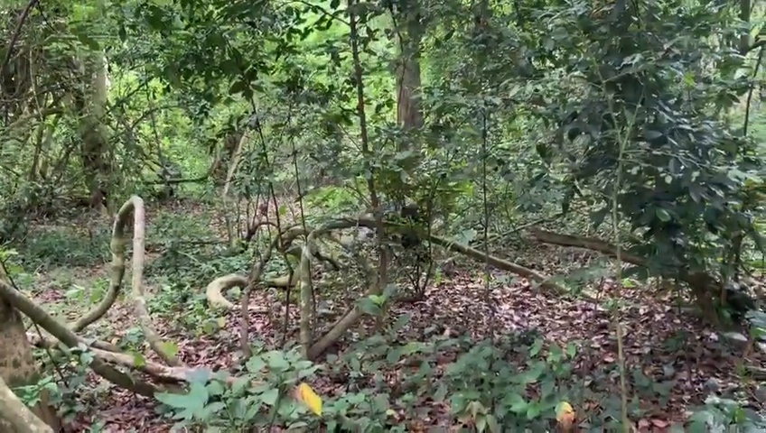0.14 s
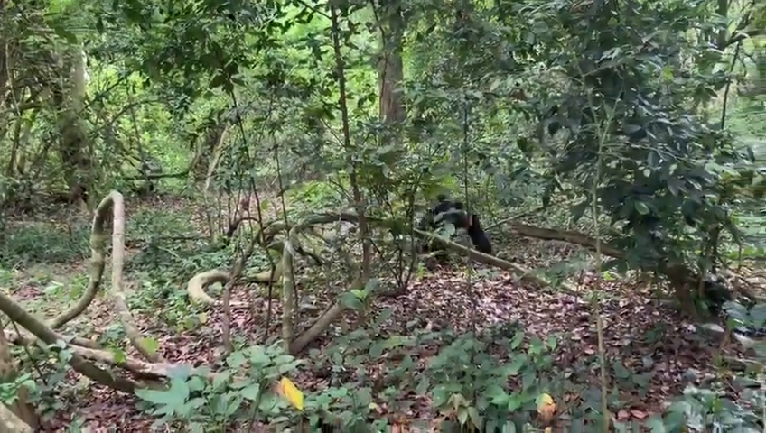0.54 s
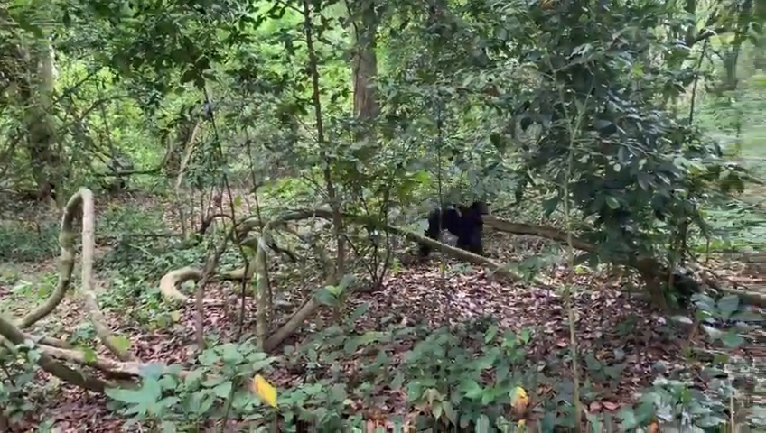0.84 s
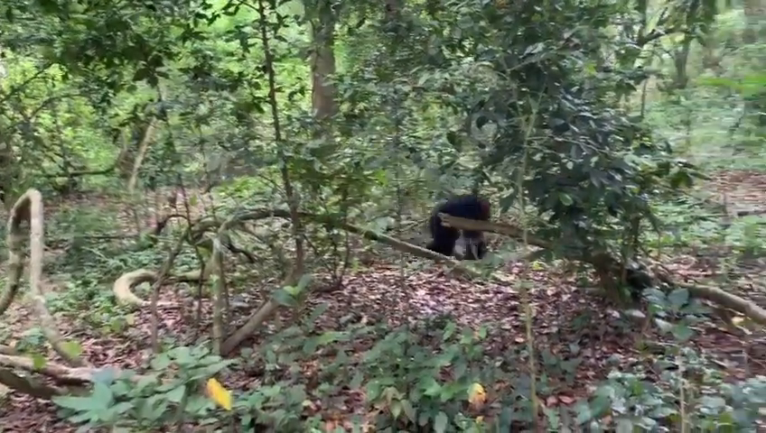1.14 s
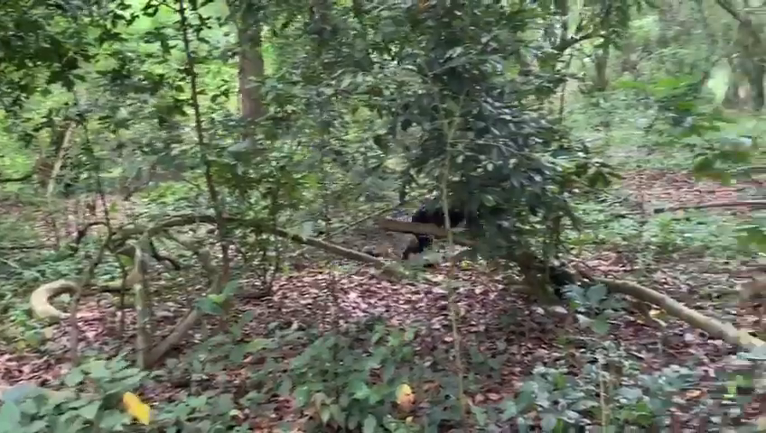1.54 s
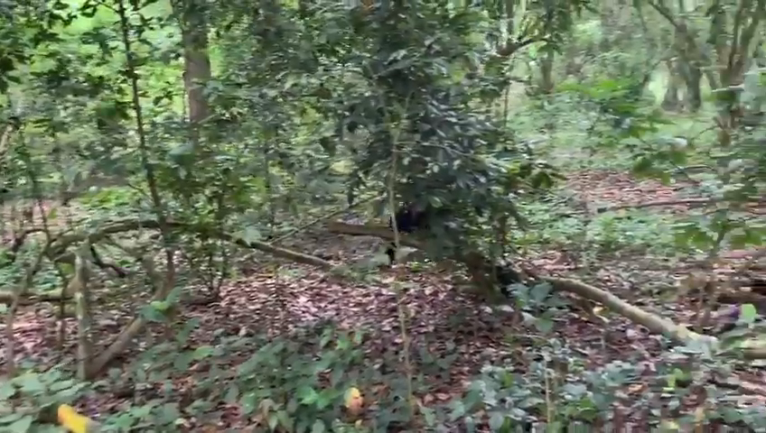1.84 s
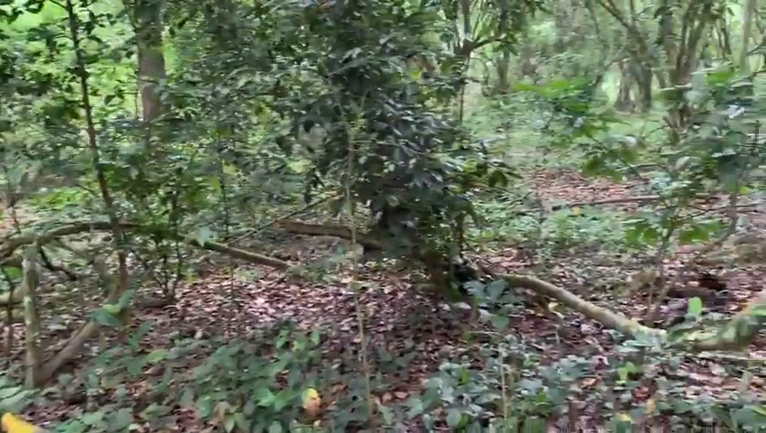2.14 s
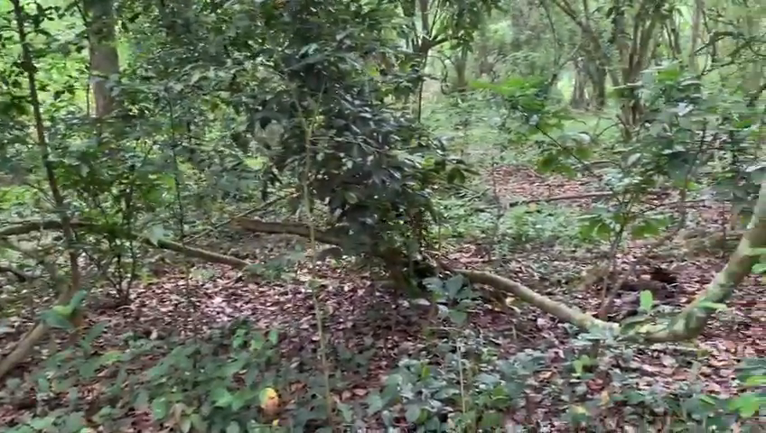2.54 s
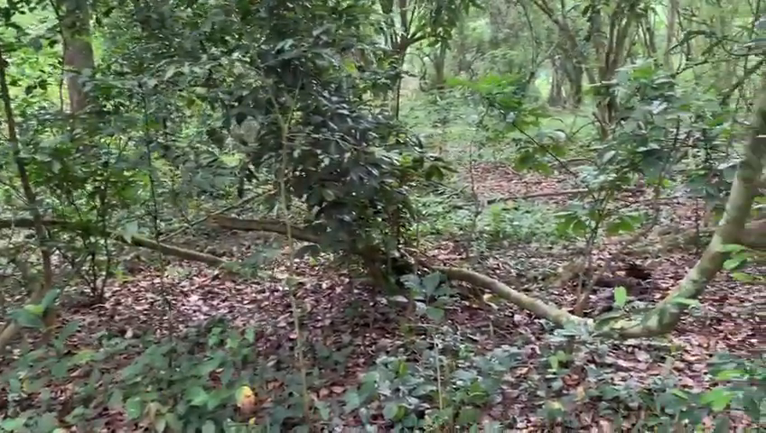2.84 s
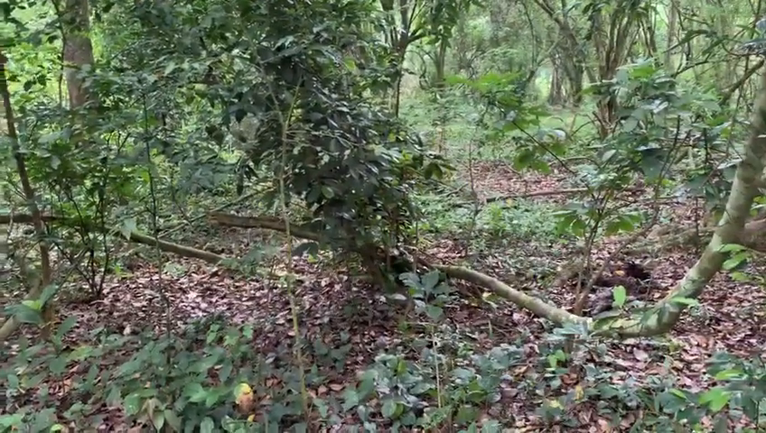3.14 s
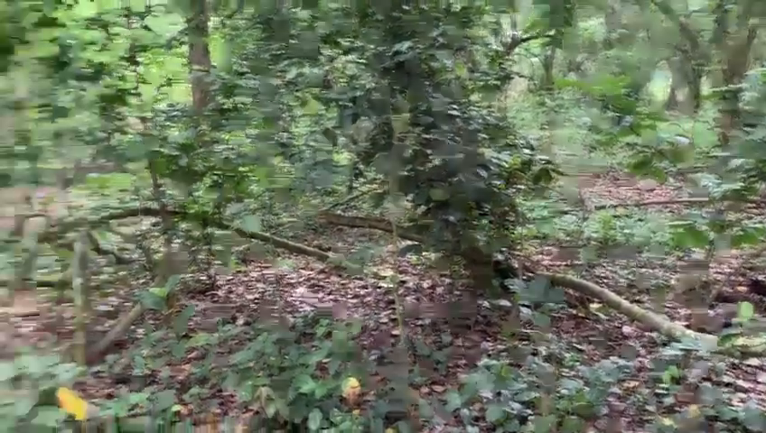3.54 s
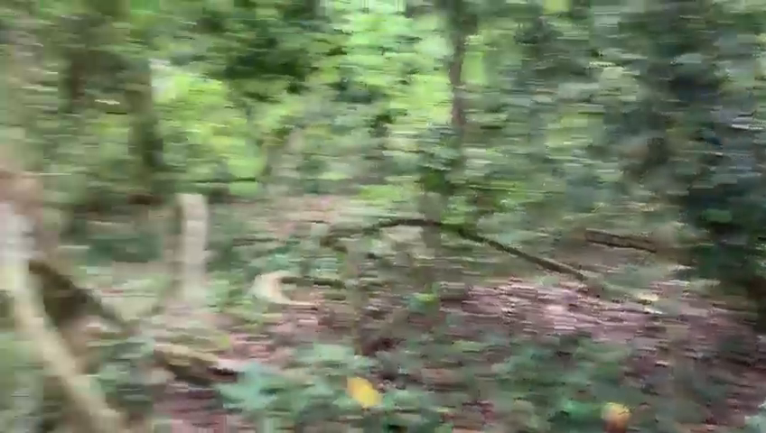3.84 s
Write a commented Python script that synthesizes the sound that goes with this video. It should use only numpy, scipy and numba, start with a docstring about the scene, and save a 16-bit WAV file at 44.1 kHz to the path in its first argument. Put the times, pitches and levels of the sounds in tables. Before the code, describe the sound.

A chimpanzee opens with a shrill, throbbing scream until 0.2 s, snarls to 0.35, hoots and wails in gliding tones to 1.0, growls roughly to 1.35, barks to 1.6, then groans and grunts lower until about 2.4. Dry leaves crackle, strongest at first, with brief microphone rumble. Trunks return thin echoes. High insect hiss and quiet air continue; faint distant bird chirps waver around 3.0-3.3 s.

```python
"""A forest at a stereo microphone: insects hiss steadily, air is quiet, and the moving microphone rumbles at first.
A chimpanzee runs over leaf litter, a crackle of noise grains: first a throbbing, shrill scream, then a snarl,
gliding hoots and a bark between rough growls, sinking to low grunts. Clear calls are summed harmonics, growls
are uneven pulses ringing a throat. The trunks return a thin echo of each call.
Once the calls have died away a distant bird chirps in wavering, gliding tones."""
import sys
import numpy as np
from scipy import signal
from scipy.fft import rfft, irfft
from scipy.io import wavfile
from scipy.ndimage import uniform_filter1d
from numba import njit

SR = 44100
rng = np.random.default_rng(int(sys.argv[2]) if len(sys.argv) > 2 else 0)


def store_wav(level_fs):
    """Save 16-bit WAV to argv[1]."""
    pcm = np.round(np.clip(np.atleast_2d(level_fs), -1, 1) * 32767)
    wavfile.write(sys.argv[1], SR, pcm.T.astype(np.int16))


N = 176400
T = np.arange(N) / SR

# forest bed, spectra of insects and still air: frequency_hz, relative_level_db
INSECT_COLOUR = [(4700, -29), (5500, -2), (6000, -8.5), (7100, 0), (7550, -11.5), (7900, -34)]
AIR_COLOUR = [(40, 1.5), (1400, -28), (2400, -11), (3600, -23), (7000, -40.5)]
# low rumble of the moving microphone: time_s, level_db
RUMBLE_LEVEL = [(.28, -52.5), (.5, -85), (2.6, -82)]
# its spectrum: frequency_hz, relative_level_db
RUMBLE_COLOUR = [(20, -12.5), (90, 0.5), (600, -33.5)]
# running through dry leaves: time_s, level_db (before a fixed lift)
RUSTLE = [(0, -40.5), (.5, -55), (1.4, -55.5), (1.65, -68.5), (2.15, -66.5), (2.3, -82)]
# spectrum of the leaves: frequency_hz, relative_level_db
LEAF_COLOUR = [(500, -6), (2800, 4.5), (6000, -2), (8500, 5.5), (11000, -26)]
# voiced calls: time_s, pitch_hz, fundamental_db, second_harmonic_db, third_harmonic_db (higher ones follow it)
SCREAM = [(0, 1201, -19, -34, -33.5), (.05, 1175, -14.5, -26, -34), (.085, 1090, -14.5, -16, -30),
          (.158, 1069, -18, -18, -25.5), (.18, 942, -13, -19.5, -42.5), (.197, 748, -35, -45, -66.5)]
HOOT = [(.328, 552, -35.5, -48, -81.5), (.348, 567.3, -18, -26, -44), (.497, 519, -28.5, -18, -45.5),
        (.522, 476.7, -34.5, -26.5, -77), (.53, 336, -43, -21.5, -43), (.549, 288, -41.5, -33.5, -59.5)]
WAIL = [(.567, 395.4, -65, -39, -44), (.584, 418, -37, -24, -24), (.603, 440, -40.5, -29, -46.5),
        (.628, 424, -44.5, -19.5, -29.5), (.652, 399.3, -41, -20.5, -29),
        (.715, 424.8, -38.5, -24.5, -35.5), (.805, 453.4, -43.5, -8, -37),
        (.858, 428.2, -43.5, -19.5, -34.5), (.895, 614, -29, -36, -28), (.922, 804.5, -10, -34.5, -30),
        (.945, 796, -8.5, -31.5, -31), (.965, 667, -29.5, -28.5, -31.5), (1.005, 577, -40, -43.5, -50)]
BARK = [(1.365, 357, -44.5, -21.5, -28.5), (1.393, 412.8, -41, -10.5, -25.5), (1.418, 466.6, -37, -17, -28),
        (1.49, 494.7, -34.5, -16.5, -34), (1.508, 423.4, -46, -11, -32.5), (1.522, 367.2, -45, -26.5, -25),
        (1.545, 360.7, -42, -18.5, -27), (1.58, 292.6, -52.5, -30, -42.5)]
# throat colour of their overtones: frequency_hz, relative_level_db
SCREAM_THROAT = [(3300, -1), (4400, 1), (6000, -13.5), (8700, -3.5), (12000, -26.5)]
HOOT_THROAT = [(1750, 6.5), (2350, -8), (2900, -17.5), (4200, -27), (11000, -49)]
BARK_THROAT = [(1350, 6.5), (1750, -27), (2800, -17.5), (6000, -43)]
# hoarseness of the voiced calls: time_s, roughness (0-1)
HOARSE = [(.05, 0.68), (.08, 0.01), (.2, 0.01), (.595, 0.57), (.65, 0.11), (.935, 0), (1.39, 0.15),
          (1.56, 0.32)]
# growls: time_s, pulse_rate_hz, level_db, roughness (0-1), mouth_resonance_hz
SNARL = [(.195, 143.6, -31.5, 0.5, 980), (.25, 140.8, -21, 0.1, 806), (.305, 115.1, -18.5, 0.17, 960),
         (.345, 122.1, -31, 0.15, 941)]
GROWL = [(1.033, 131.1, -30, 0.55, 873), (1.062, 130.8, -18, 0.059, 793), (1.15, 126.5, -21.5, 0.39, 767),
         (1.185, 125.2, -18.5, 0.021, 574), (1.25, 126.8, -17.5, 0.04, 593), (1.275, 121.9, -20, .45, 840),
         (1.298, 110.8, -19.5, 0.47, 730), (1.338, 104.9, -33.5, 0.34, 600)]
GROAN = [(1.622, 96.04, -48, 0.93, 510), (1.645, 95.74, -28, 0.27, 741), (1.7, 90.17, -31, 0.63, 330),
         (1.815, 91.76, -28.5, 0.057, 373), (1.94, 78.84, -31, 0.62, 289), (1.98, 69.5, -39.5, 0.5, 252.9)]
GRUNT = [(1.985, 72.24, -40.5, 0.6, 231.7), (2.06, 63.02, -38, 0.66, 220), (2.225, 61, -44.5, 0.18, 90.1),
         (2.29, 57.9, -60.5, 0.26, 64.8), (2.335, 142.5, -52, 0.12, 140), (2.4, 107, -68.5, 0.091, 108.3)]
# growl colour with open lips, nearly closed lips, and in the last deep grunts: frequency_hz, relative_level_db
OPEN_THROAT = [(60, -28.5), (125, -10), (270, -18), (520, 0.5), (900, 0), (1200, -7.5), (1450, -42),
               (1900, -12.5), (2200, -38), (6000, -50.5)]
CLOSED_THROAT = [(35, -15), (70, -4.5), (180, 3), (350, 2), (540, -11.5), (720, 7.5), (1250, -39.5),
                 (2400, -47), (3300, -23.5), (3900, -73)]
CHEST = [(25, -6), (62, 2.5), (600, -11.5), (1600, -40)]
# spectrum of the trunk echo: frequency_hz, relative_level_db
ECHO_COLOUR = [(800, -12), (2200, -1.5), (12000, -10)]
# distant chirps: start_s, length_s, start_hz, end_hz, level_db
CHIRPS = [(2.963, 0.051, 2157, 1600, -67.5), (3.03, 0.088, 2850, 3120, -65.5),
          (3.138, 0.057, 1807, 2660, -63), (3.273, 0.064, 2500, 1890, -67.5)]

INSECT_DB, AIR_DB = -63, -71.5
FLUTTER_HZ, FLUTTER_PEAK_S, FLUTTER_END_S, FLUTTER_DEPTH = 62.2, 0.003, 0.069, 0.72
# fractions: pitch and level shake at full roughness, and a pitch wobble that is always there
JITTER, SHIMMER, WOBBLE = 0.072, 0.3, 0.007
WAVER_DB, WAVER_HZ = 3.5, 30  # each harmonic from the third up wavers on its own
RUSH_DB = -8.5  # throat air at full roughness, relative to the third harmonic
ECHO_DB, ECHO_T60_S = -16.5, 0.57
FAR_DB, FAR_T60_S = -19.5, 2.4  # long tail, level relative to the near echo
PORT_LAG_S, PORT_MAX_RAD = 0.00006, 2.2  # right microphone port behind left
TOP_HZ = 12200  # upper limit of the recorder and of the harmonics


def undb(db):
    """Decibels to gain."""
    return 10 ** (np.asarray(db) / 20)


def unit(x):
    """Scale to rms 1."""
    return x / np.sqrt(np.mean(x ** 2))


def response(points, hz):
    """Gain of a spectrum at the given frequencies, straight in dB over log frequency."""
    point_hz, db = np.array(points).T
    return undb(np.interp(np.log(np.maximum(hz, 1)), np.log(point_hz), db))


def colour(x, points):
    """Causal (minimum-phase) filter with the given spectrum, by folding its cepstrum."""
    cepstrum = irfft(np.log(response(points, np.arange(N + 1) / 2 * SR / N)))
    cepstrum[1:N] *= 2
    cepstrum[N + 1:] = 0
    return irfft(rfft(x, 2 * N) * np.exp(rfft(cepstrum)))[..., :N]


def noise(points, channels=1):
    """Coloured noise of rms 1."""
    return unit(colour(rng.standard_normal((channels, N)), points))


def walk(rate_hz, size=N):
    """Smooth random wander of rms 1: white noise rolled off above rate_hz."""
    hz = np.arange(size // 2 + 1) * SR / size
    return unit(irfft(rfft(rng.standard_normal(size)) / (1 + (hz / rate_hz) ** 4), size))


def controls(table, fade_s=0.0072):
    """A gate over the table's span, fading just outside it, and its columns as smooth curves."""
    times, *columns = np.array(table, float).T
    gate = np.clip(np.minimum(T - times[0], times[-1] - T) / fade_s + 1, 0, 1)
    return gate, [uniform_filter1d(np.interp(T, times, c), size=220) for c in columns]


def insects():
    """Steady insect hiss on all sides: noise drawn apart for each channel."""
    return undb(INSECT_DB + 0.5 * walk(12)) * noise(INSECT_COLOUR, channels=2)


def air():
    """Quiet forest air, slowly swelling: one noise common to both channels, plus a weaker one in each."""
    spread = noise(AIR_COLOUR) + 0.5 * noise(AIR_COLOUR, channels=2)
    return undb(AIR_DB + 3.6 * walk(1.6)) * spread


def rumble():
    """Low rumble of the moving microphone, equal in both channels."""
    return undb(np.interp(T, *np.array(RUMBLE_LEVEL).T)) * noise(RUMBLE_COLOUR)


def leaves():
    """Dense crackle of dry leaves under the running animal: noise grains of very uneven size."""
    gate, (db,) = controls(RUSTLE)
    middle, side = rng.standard_normal((2, N)) * undb(3.6 * rng.exponential(size=N))
    stereo = middle + 1.3 * side * np.array([[1], [-1]])
    level = undb(db + 3.2 * walk(38) + 6.5)
    return gate * level * unit(colour(stereo, LEAF_COLOUR))


def flutter():
    """The scream starts with a fast throb before it locks onto a clean tone."""
    depth = FLUTTER_DEPTH * np.clip((FLUTTER_END_S - T) / 0.02, 0, 1)
    return 1 + depth * np.cos(2 * np.pi * FLUTTER_HZ * (T - FLUTTER_PEAK_S))


def voiced(table, throat, half=0):
    """Vocal folds on a gliding pitch; hoarseness shakes them, and half makes strong and weak cycles alternate."""
    gate, curves = controls(table)
    on = gate > 0
    hz, first, second, third = (c[on] for c in curves)
    rough = np.interp(T[on], *np.array(HOARSE).T)
    shaken_hz = hz * (1 + WOBBLE * walk(27)[on] + JITTER * rough * walk(220)[on])
    phase = 2 * np.pi * np.cumsum(shaken_hz) / SR

    harmonic = np.arange(1, 25)[:, None]
    size = response(throat, harmonic * hz) * (harmonic * hz < TOP_HZ)
    size *= undb(third) / size[2]
    size *= undb(WAVER_DB * np.array([walk(WAVER_HZ, size=len(hz)) for _ in harmonic]))
    size[0], size[1] = undb(first), undb(second)
    start_phase = rng.uniform(0, 2 * np.pi, harmonic.shape)
    tone = np.sqrt(2) * np.sum(size * np.sin(harmonic * phase + start_phase), axis=0)

    shake = 1 + rough * (SHIMMER * walk(270)[on] + half * np.sin(phase / 2))
    # air rushing through the throat, pulsing once a cycle
    rush = rough * undb(third + RUSH_DB) * noise(throat)[0, on] * (1 + np.cos(phase))
    out = np.zeros(N)
    out[on] = gate[on] * (tone * shake + rush)
    return out


@njit
def resonance(x, hz, width_hz):
    """Band-pass with a moving centre and gain 1 there, as a two-integrator filter."""
    y, band, low = np.empty(len(x)), 0., 0.
    for i in range(len(x)):
        g, damping = np.tan(np.pi * hz[i] / SR), width_hz / hz[i]
        v = (band + g * (x[i] + 1e-18 - low)) / (1 + g * (g + damping))
        band, low, y[i] = 2 * v - band, low + 2 * g * v, damping * v
    return y


def growl(table, throat, scatter_s, rasp, mouth_db, width_hz):
    """Slow, uneven pulses, each with a puff of rasp, ring the throat and a moving mouth resonance."""
    gate, (hz, db, rough, mouth_hz) = controls(table)
    cycles = np.cumsum(hz) / SR
    at = np.flatnonzero(np.diff(np.floor(cycles))) + 1
    late, strength = rng.standard_normal((N // 100, 2))[:len(at)].T
    shifted = at + (late * rough[at] * scatter_s * SR).astype(int)
    pulses = np.zeros(N)
    pulses[np.clip(shifted, 0, N - 1)] = undb(1.1 * strength * rough[at])
    pulses = unit(pulses)
    puffs = unit(np.exp(-(cycles % 1) / 0.56) * rng.standard_normal(N))

    x = colour(pulses - np.mean(pulses) + rasp * rough * puffs, throat)
    x = x + undb(mouth_db) * resonance(x, mouth_hz, float(width_hz))
    # even out the running level so that the table sets it
    return gate * undb(db) * x / np.sqrt(uniform_filter1d(x ** 2, size=1400) + 1e-12)


def chimpanzee():
    """The whole run of calls, from scream to last grunt, clear folds and rough pulses by turns."""
    return (flutter() * voiced(SCREAM, SCREAM_THROAT)
            + growl(SNARL, OPEN_THROAT, scatter_s=0.0002, rasp=2.7, mouth_db=15, width_hz=23)
            + voiced(HOOT, HOOT_THROAT)
            + voiced(WAIL, HOOT_THROAT)
            + growl(GROWL, OPEN_THROAT, scatter_s=0.00096, rasp=3.36, mouth_db=10.5, width_hz=61)
            + voiced(BARK, BARK_THROAT, half=0.45)
            + growl(GROAN, CLOSED_THROAT, scatter_s=0.00059, rasp=2.9, mouth_db=13, width_hz=20.6)
            + growl(GRUNT, CHEST, scatter_s=0.0017, rasp=6.6, mouth_db=8.5, width_hz=59.0))


def ports(voice):
    """The call reaches the left port a moment before the right: a phase lead that grows to a limit."""
    hz = np.arange(N + 1) / 2 * SR / N
    lead = np.minimum(2 * np.pi * PORT_LAG_S * hz, PORT_MAX_RAD)
    return irfft(rfft(voice, 2 * N) * np.exp(0.5j * np.array([lead, -lead])))[:, :N]


def trunks(x, wet_db):
    """Scattered echoes from near trunks and a faint long tail from the deep forest, as decaying noise."""
    decay = undb(-60 * T / ECHO_T60_S) + undb(FAR_DB - 60 * T / FAR_T60_S)
    build_up = np.minimum(T / 0.025, 1)
    echo = unit(noise(ECHO_COLOUR, channels=2) * decay * build_up) / np.sqrt(N)
    return undb(wet_db) * signal.fftconvolve(x[None], echo, axes=1)[:, :N]


def bird():
    """Chirps gliding in pitch with a fast waver, blurred by the distance through trunk echo."""
    out, waver = np.zeros(N), 1 + 0.0293 * walk(158.0)
    for start_s, length_s, from_hz, to_hz, db in CHIRPS:
        progress = np.clip((T - start_s) / length_s, 0, 1)
        hz = (from_hz + (to_hz - from_hz) * progress) * waver
        swell = 2 * np.sin(np.pi * progress)
        out += undb(db) * swell * np.sin(2 * np.pi * np.cumsum(hz) / SR)
    return out + trunks(out, wet_db=-5.0)


def scene():
    """Forest and running leaves around the calls and their echo, then the distant bird."""
    forest = insects() + air() + rumble()
    voice = chimpanzee()
    calls = ports(voice) + trunks(voice, wet_db=ECHO_DB)
    return forest + leaves() + calls + bird()


def record(dry):
    """The recorder cuts the top with a steep low-pass."""
    return signal.sosfilt(signal.ellip(8, .2, 70, TOP_HZ, fs=SR, output="sos"), dry)


dry = scene()
out = record(dry)
store_wav(out)
```